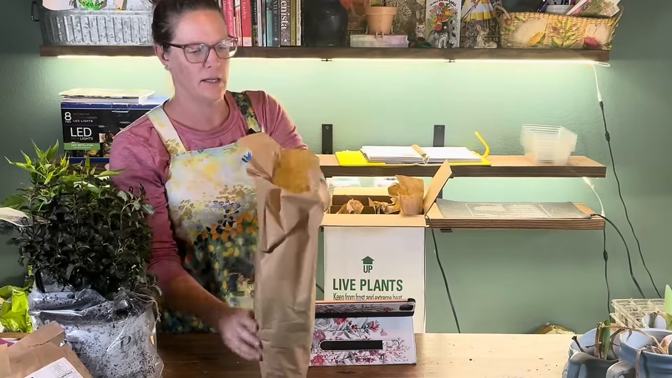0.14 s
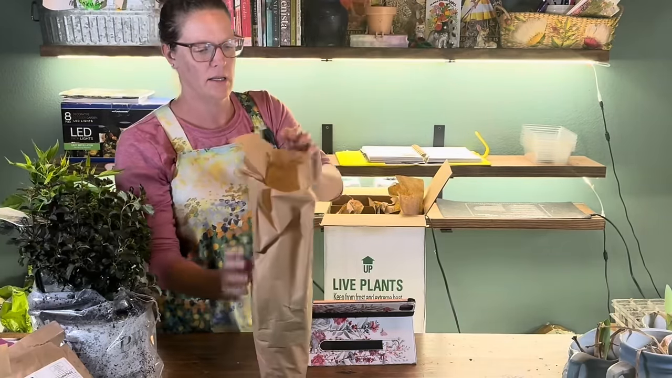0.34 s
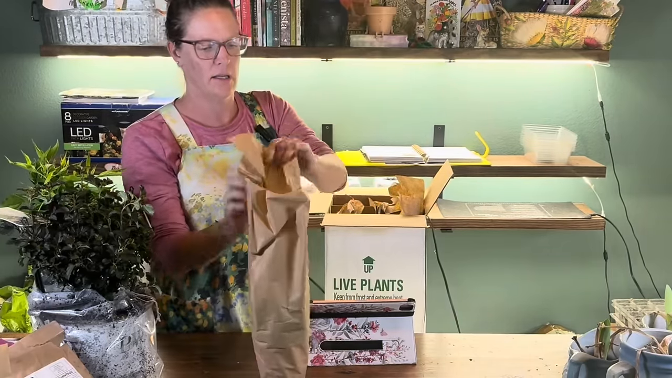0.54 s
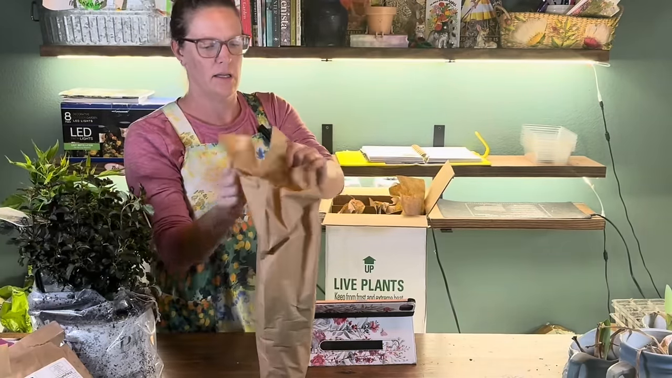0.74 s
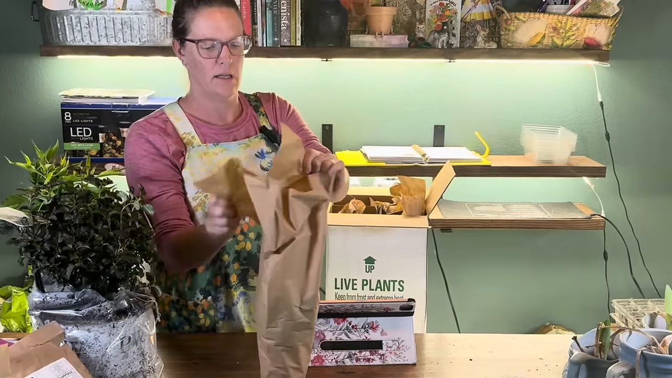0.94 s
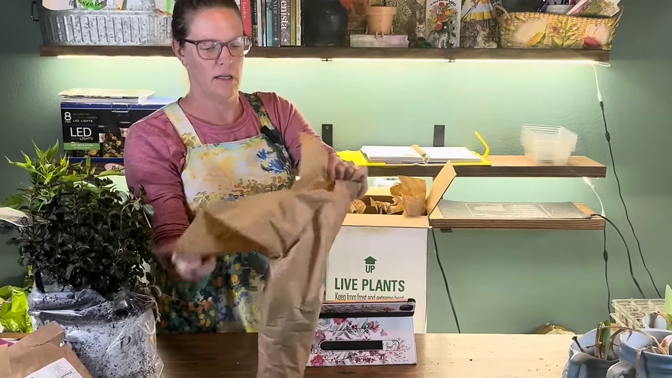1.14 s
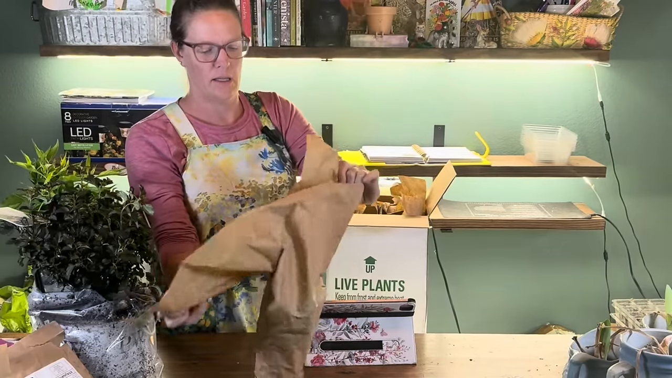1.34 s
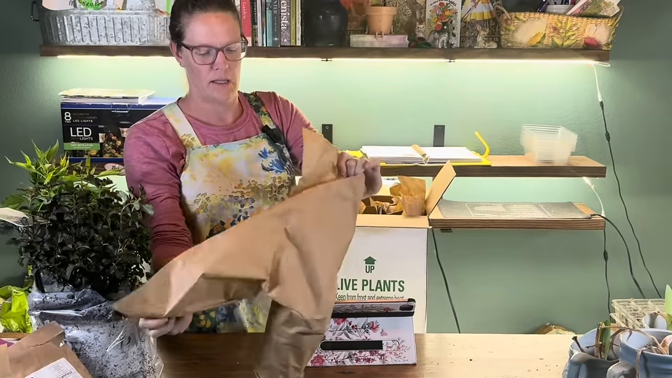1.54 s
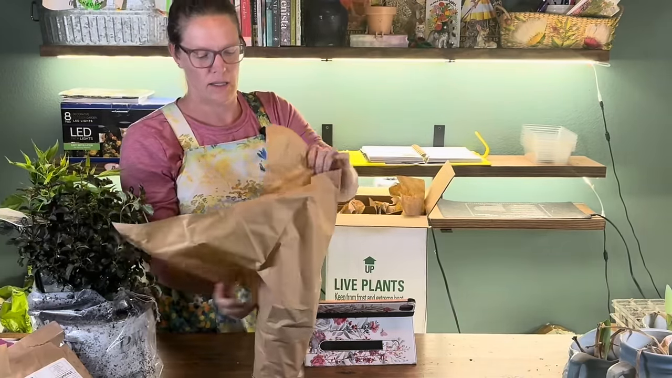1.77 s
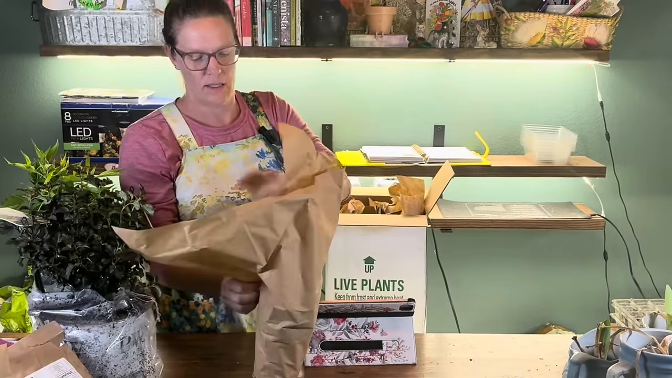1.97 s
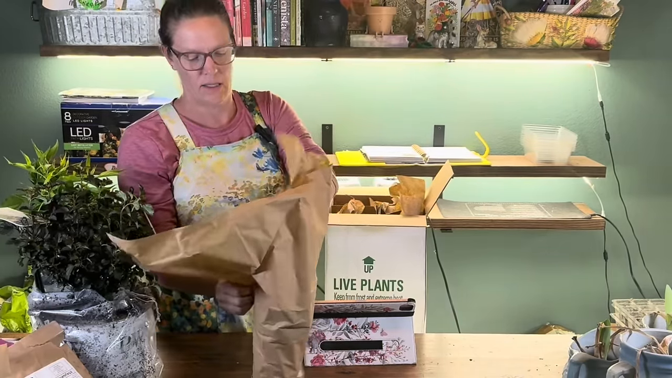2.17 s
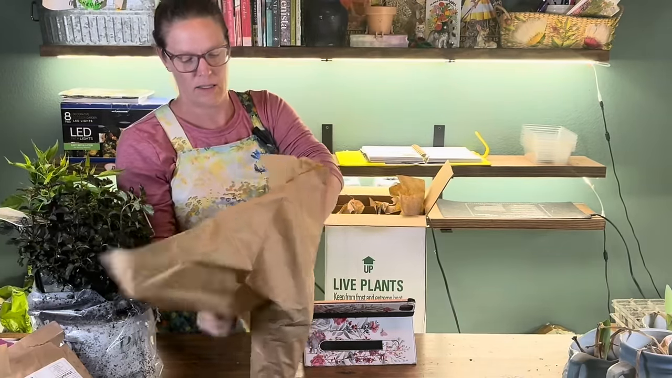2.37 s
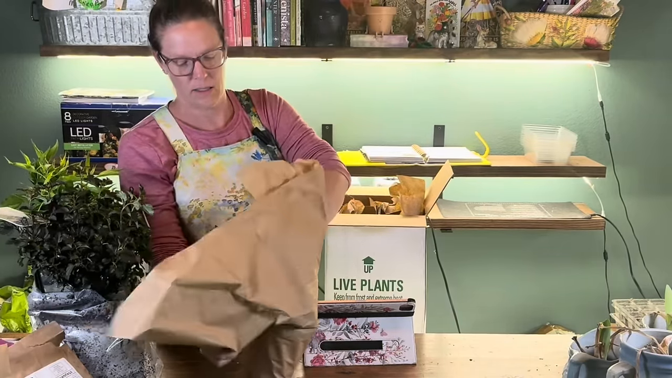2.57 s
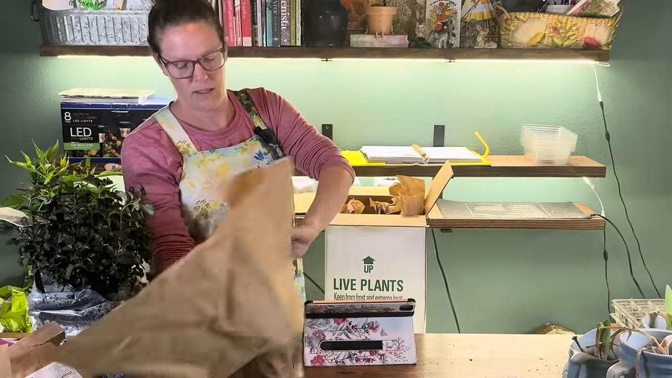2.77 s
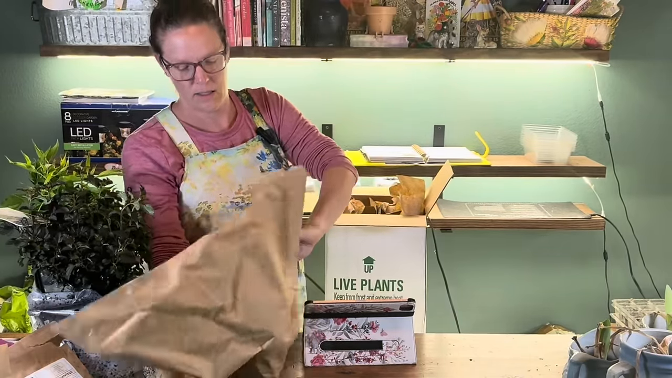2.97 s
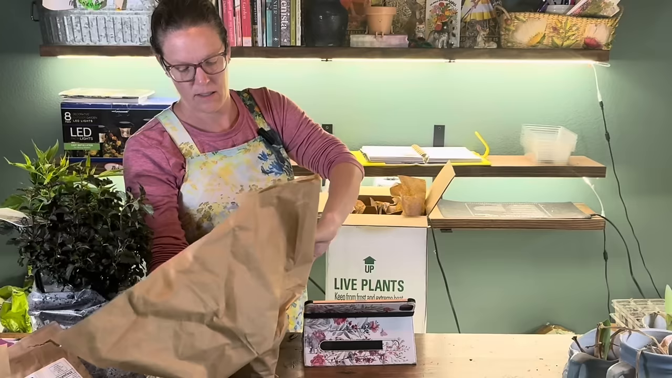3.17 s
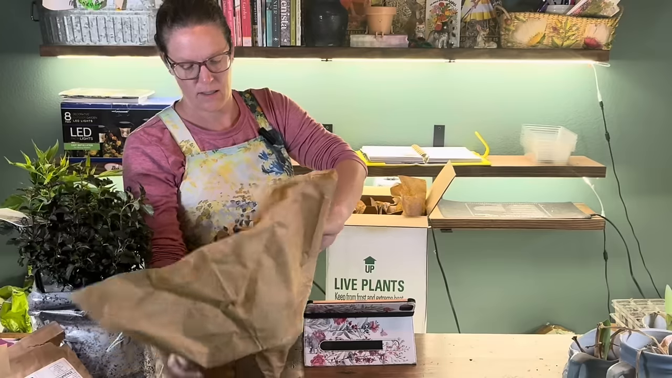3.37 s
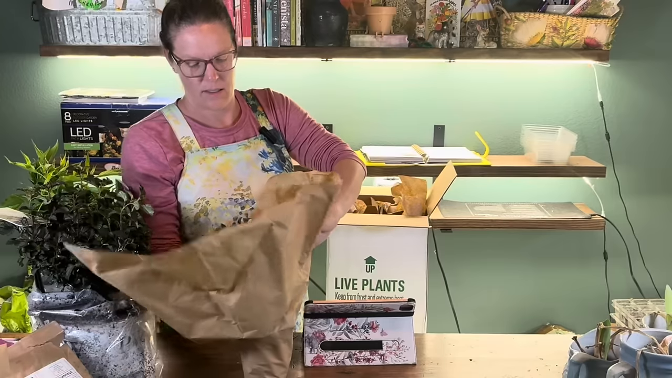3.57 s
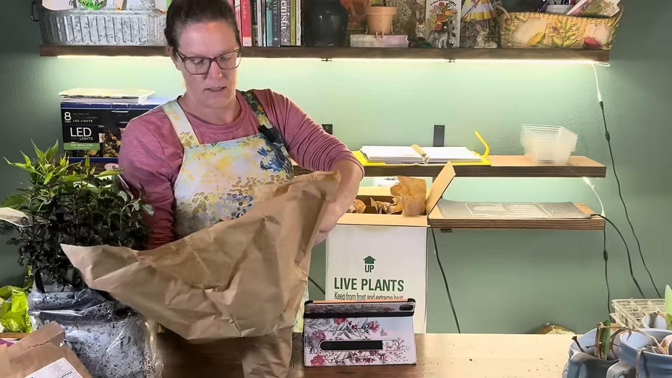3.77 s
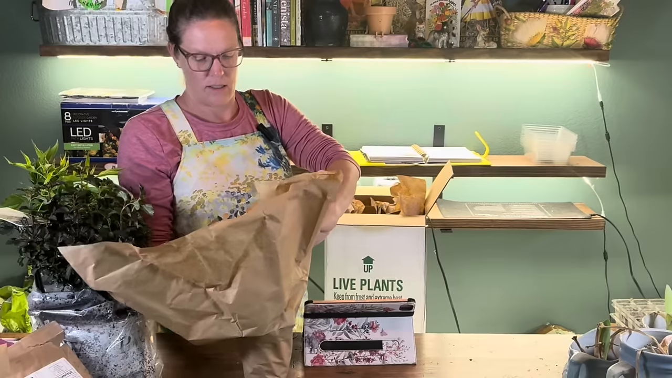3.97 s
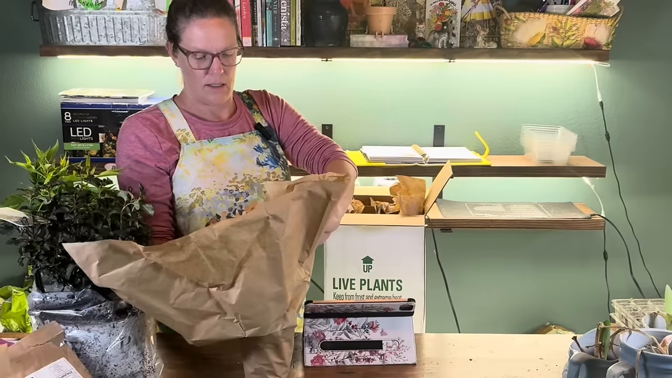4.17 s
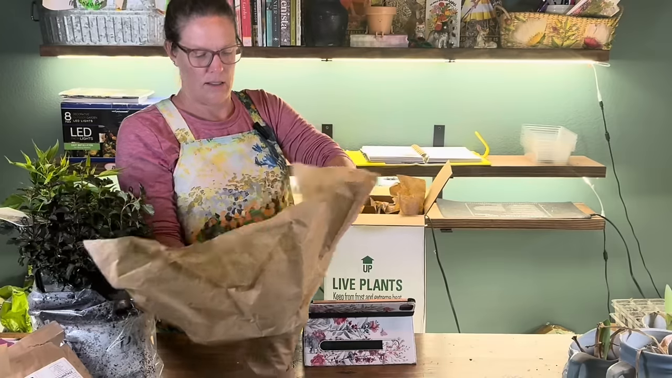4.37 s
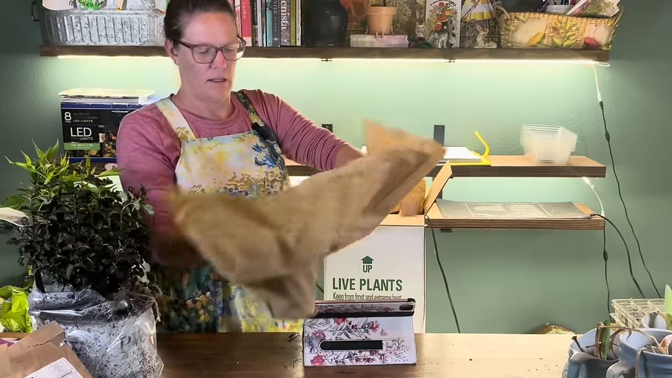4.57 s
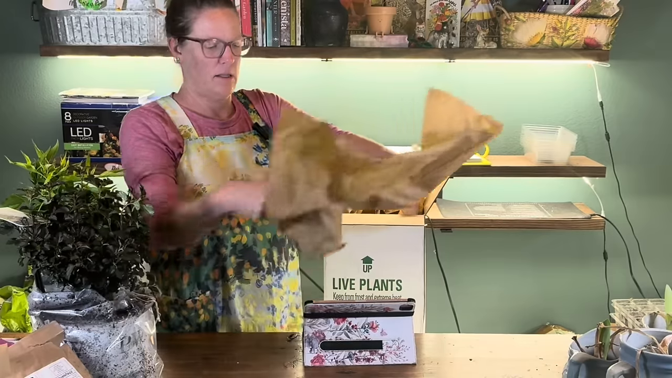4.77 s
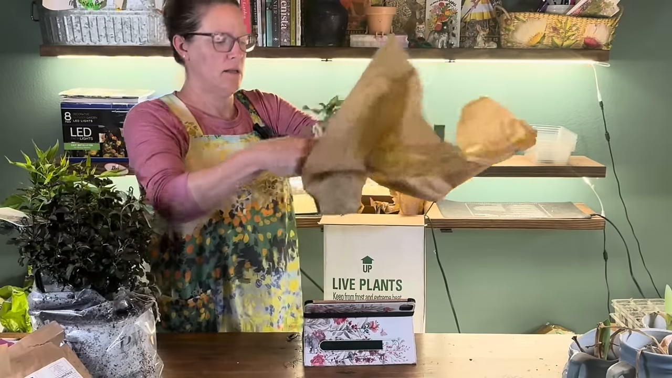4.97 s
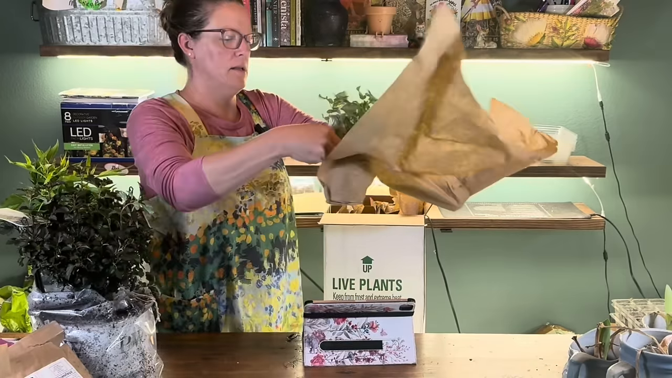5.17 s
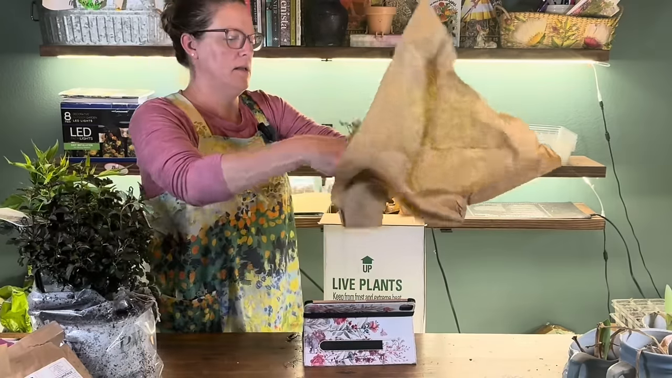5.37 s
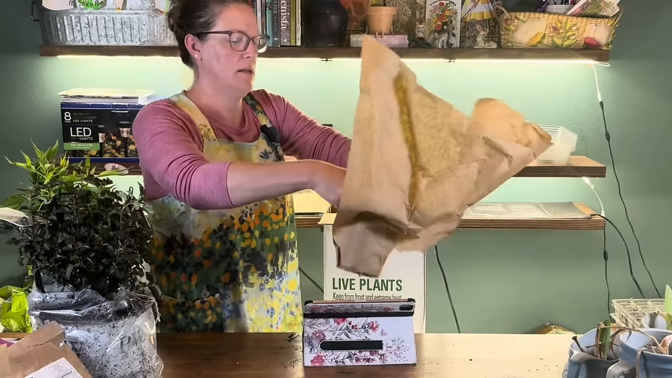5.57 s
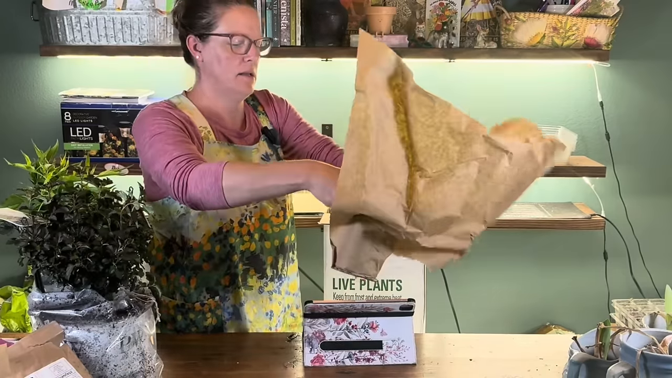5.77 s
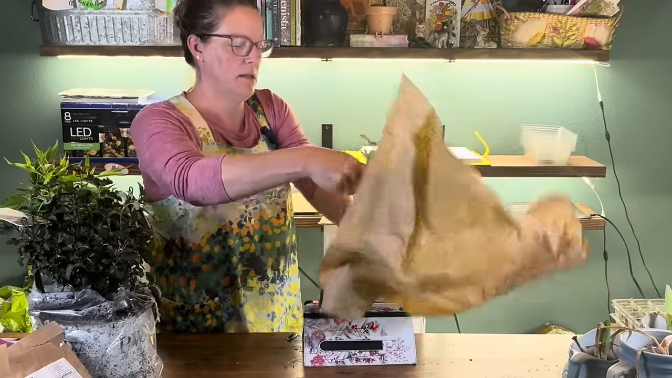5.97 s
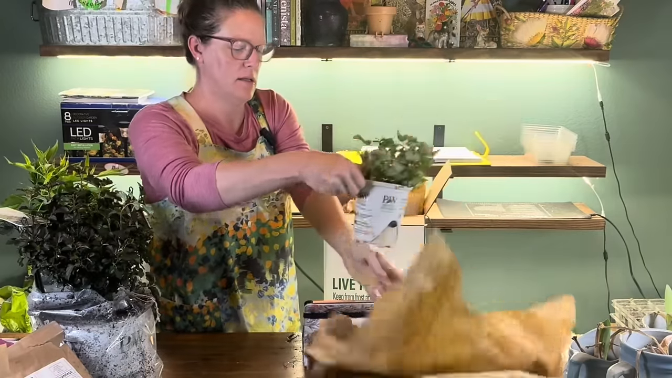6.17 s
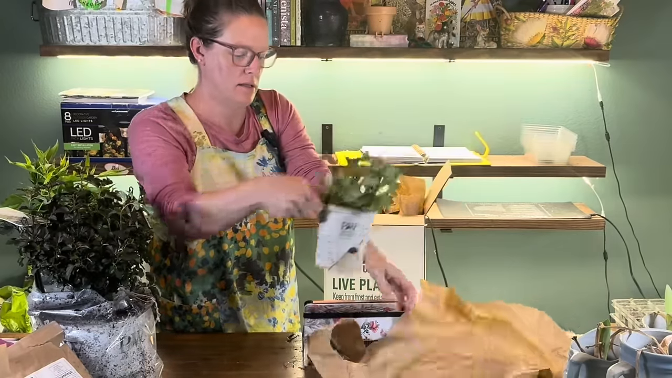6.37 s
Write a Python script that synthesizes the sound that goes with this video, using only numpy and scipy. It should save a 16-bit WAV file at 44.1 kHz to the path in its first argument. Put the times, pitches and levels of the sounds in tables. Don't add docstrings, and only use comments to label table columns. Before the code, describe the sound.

Thick paper wrapping crackles close to a phone microphone in a small room. It begins with crisp creases popping, swells into a long harsh crumple, and falls back to low wind-like thumps and faint rustle. Shorter hard bursts with sharp cracks come and go, separated by near-quiet handling. A later bright burst fades into sparse ticks, hollow taps and soft rubbing over faint room hiss.

```python
import sys
import numpy as np
from scipy import signal
from scipy.fft import rfft, irfft
from scipy.io import wavfile
from scipy.ndimage import uniform_filter1d

SR = 44100
rng = np.random.default_rng(int(sys.argv[2]) if len(sys.argv) > 2 else 0)


def boost(x):
    u = np.asarray(x, float) / 20
    return 10 ** u


def to_wav(sig):
    pcm = np.clip(np.atleast_2d(sig), -1, 1) * 32767
    pcm = np.round(pcm).astype(np.int16)
    wavfile.write(sys.argv[1], SR, pcm.T)


N = 282681


def evened(x):
    return x / np.sqrt(np.mean(x ** 2) + 1e-20)


def read(points, hz):
    f, value = np.transpose(points)
    return np.interp(np.log(hz + 1), np.log(f + 1), value)


def wander(samples):
    size = int(samples)
    smooth = uniform_filter1d(rng.standard_normal(N), size)
    return evened(uniform_filter1d(smooth, size))


def in_time(per_ms):
    return np.interp(np.arange(N) / SR * 1000, np.arange(len(per_ms)), per_ms)


def stroke(crest_s, rise_s, fall_s, db, bend=1.83):
    drop_db = 25
    late = np.arange(0, N / SR + .01, .001) - crest_s
    away = abs(late) / np.maximum(np.where(late < 0, rise_s, fall_s), .01)
    return boost(2 * (db - drop_db * np.minimum(away, 4) ** bend))


def background():
    # pitch_hz, level_db
    hiss_colour = [(15, -38), (25, 10), (119, -1), (193, -6.5), (297, 2), (800, -1), (1400, -5),
                   (2200, -8.5), (5160, -10), (7520, -2.5), (15600, -22.5)]
    # pitch_hz, rms_db
    hum_tones = [(120, -72), (300, -77)]
    hz = np.fft.rfftfreq(N, 1 / SR)
    hiss = irfft(rfft(rng.standard_normal(N)) * boost(read(hiss_colour, hz)), N)
    t = np.arange(N) / SR
    hum = sum(boost(db) * np.sqrt(2) * np.sin(2 * np.pi * f * t) for f, db in hum_tones)
    return boost(-61) * evened(hiss) + hum


def air():
    # crest_s, peak_db, pitch_hz, length_cycles
    puff_events = [(1.78, -32, 70, 0.52), (1.805, -36, 81.2, 0.42), (3.39, -45, 55, 0.4),
                   (3.647, -40, 149.5, 0.42), (4.079, -40.5, 130, 0.39), (5.274, -41, 90, 0.55),
                   (5.346, -41, 123, 0.39), (5.729, -39.5, 105, 0.66), (5.905, -40, 70.4, 0.51),
                   (6.229, -30, 131, 0.26), (3.602, -48.5, 590, 16), (3.655, -48.5, 603, 14),
                   (3.588, -42, 150, .5), (5.243, -40, 80, 0.5), (5.62, -47, 90, .6),
                   (5.642, -42.5, 130, 0.73), (5.657, -44, 80, .6), (1.635, -42, 120, 0.64),
                   (1.712, -46, 85, .8), (1.938, -43, 90, 1), (2.18, -44, 110, 0.76)]
    # crest_s, rise_s, level_db
    gust_events = [(.32, 0.053, -39), (1.12, 0.93, -46.5), (1.25, 0.091, -52), (1.39, 0.11, -34),
                   (1.689, 0.73, -49), (1.78, 0.065, -27.5), (1.95, 0.12, -32), (2.18, 0.15, -45.5),
                   (2.41, .22, -53), (2.73, 0.08, -37.5), (3.21, 1, -44.5), (3.639, 0.2, -41.5),
                   (4.08, 0.14, -41.5), (4.82, 0.3, -37), (5.14, .08, -71), (5.341, 0.63, -41),
                   (5.65, 0.12, -42), (5.91, 0.13, -51), (6.23, 0.056, -40.5), (6.41, 0.29, -46.5)]
    fall_s, calm_db = 0.094, -64.5
    t = np.arange(N) / SR
    pushes = np.zeros(N)
    for s, db, hz, cycles in puff_events:
        swell = np.exp(-((t - s) * hz / cycles) ** 2)
        pushes += boost(db) * swell * np.sin(2 * np.pi * hz * (t - s) + 1.0)
    band = signal.butter(2, [40, 170], "band", fs=SR, output="sos")
    rumble = signal.sosfilt(band, rng.standard_normal(N))
    lumpy = evened(rumble * boost(5.4 * wander(700)))
    power = boost(2 * calm_db) + sum(stroke(s, rise_s, fall_s, db, bend=1.0)
                                   for s, rise_s, db in gust_events)
    return pushes + in_time(np.sqrt(power)) * boost(-8.5) * lumpy


def taps():
    # start_s, peak_db, pitch_hz, t60_s
    tap_events = [
        (3.564, -43.5, 1040, 0.09),
        (3.568, -40, 806, 0.051),
        (3.673, -45, 970, .05),
        (5.592, -46, 740, 0.056),
        (6.0712, -41, 720, 0.066),
        (6.1535, -45.5, 904, 0.16),
        (6.2605, -41, 850, .1),
    ]
    t, out = np.arange(SR // 4) / SR, np.zeros(N + SR)
    for s, db, hz, t60 in tap_events:
        pair = np.sin(2 * np.pi * hz * t) + 0.92 * np.sin(2 * np.pi * 1.5 * hz * t)
        attack = np.minimum(t / 0.0009, 1)
        out[round(s * SR):][:len(t)] += boost(db - 60 * t / t60) * attack * pair
    return out[:N]


def causal(gain_db):
    log_gain = np.log(boost(np.maximum(gain_db, -100)))
    circle = np.concatenate([log_gain, log_gain[-2:0:-1]])
    response = np.fft.ifft(np.exp(np.conj(signal.hilbert(circle)))).real[:768]
    return response / np.linalg.norm(response)


def zones(draw, bump_db):
    # pitch_hz, level_db
    paper_colour = [(35, -60.5), (60, -46.5), (135, -21.5), (285, -8), (534, -8.5), (614, -5), (1350, -7),
                    (2260, -7), (3680, -6), (5590, -5), (7740, -1.5), (10000, -10), (11800, -12),
                    (14500, -15), (15800, -17)]
    # pitch_hz, width_hz, level_db
    port_humps = [
        (7820, 2000, 10),
        (2200, 240, -1.5),
    ]
    zone_edges_hz = [920, 2200, 5500]
    hz = np.fft.rfftfreq(1024, 1 / SR)
    humps = np.interp(hz, SR / 2 * np.linspace(0, 1, len(draw)) ** 1.5, draw)
    low, mid, high = (1 / (1 + ((hz + 1) / edge) ** 8) for edge in zone_edges_hz)
    port_db = sum(db / (1 + (2 * (hz - f) / width) ** 2) for f, width, db in port_humps)
    slid_hz = hz * np.exp(0.34 * draw[0] * (high - low))
    own_db = read(paper_colour, slid_hz) + bump_db * humps + port_db
    shares = 1 - high, low, mid - low, high - mid
    return np.array([causal(own_db + 10 * np.log10(share + 1e-9)) for share in shares])


def flutter(ms, draw, rise_ms=0.27):
    t_ms = np.arange(len(draw)) / SR * 1000
    burst = draw * (1 - np.exp(-t_ms / rise_ms)) * np.exp(-t_ms / np.maximum(ms, .1))
    return burst / np.linalg.norm(burst)


def snaps():
    # start_s, peak_db, panels_rel_db, middle_rel_db, ring_hz
    finger_folds = [(0.0673, -16.5, -23.5, -9.5, 5360), (.179, -19, -35, -10.5, 4190),
                    (0.2404, -32, -19, -8, 4930), (0.257, -14.5, -20, -15.5, 3470),
                    (.3571, -34.5, -2, 0, 4530), (0.4933, -8, -30, -9, 4030),
                    (0.5459, -32.5, -1, 6.5, 4760), (0.58, -13, -1.5, -1.5, 3900),
                    (0.6193, -23.5, -0.5, 5, 4000), (0.653, -12, -18, -5.5, 4640),
                    (0.69, -29.5, -5, 6, 3380), (0.71, -23, 2.5, 6, 3580), (0.728, -17.5, -2, 2.5, 4580),
                    (0.7483, -15.5, -8, -0.5, 4160), (1.573, -29.5, -12, -14, 4420),
                    (1.6221, -30.5, -7, 1.5, 4400), (1.6458, -26, -6, -8, 3430),
                    (1.6935, -34.5, -7, -4, 3200), (1.7243, -26, -2.5, -2.5, 4900),
                    (2.1777, -16.5, -14, -3, 4450), (2.203, -42.5, 10.5, -17, 3760),
                    (2.224, -26.5, -11, -12, 3740), (2.2705, -20.5, -24, -2.5, 3570),
                    (5.7742, -28, -3, -0.5, 2560), (0.247, -29.5, -10, -4, 3480),
                    (0.576, -27.5, -15, -1, 4000)]
    # start_s, peak_db, panels_rel_db, middle_rel_db
    pull_snaps = [(0.767, -13, -4, 2.5), (4.85, -9.5, -4, -9), (1.04, -11, -21, -4.5),
                  (1.336, -3, -31.5, -27.5), (1.3814, -5, -18, 1), (2.3023, -24, -24, -22.5),
                  (2.3925, -1, -29, -6.5), (2.6743, -18.5, -27, -32), (2.6912, -6, -21, -21),
                  (2.7254, -2, -12, -10.5), (3.1225, -21, -13, -21), (3.136, -6, -26, -32.5),
                  (3.149, -7, -30, -25), (3.169, 4.5, -39, -25.5), (3.1885, -2, -27.5, -27),
                  (3.202, 4.5, -35, -28), (3.281, -14.5, -24, -13), (4.4829, -10.5, -22, -21),
                  (4.5183, -5, -25, -44), (4.5509, -13.5, -31, -4.5), (4.7378, -19, -10.5, -16),
                  (4.7452, -15.5, -14, -14.5), (4.7572, -11.5, -16, -29), (4.7822, -2.5, -52.5, -10),
                  (4.9617, -22.5, -21, -23.5), (4.9713, -15.5, -17, -21), (4.9874, -17.5, -14, 0),
                  (5.0635, -17.5, -9.5, 1), (5.0783, -14.5, -8, 2.5), (5.1384, -6, -13.5, 4)]
    # start_s, peak_db, panels_rel_db, middle_rel_db
    more_folds = [(1.783, -30.5, -27, -24), (1.981, -44, -2, -2.5), (2.149, -39.5, -2, -12),
                  (3.022, -37.5, -5, -22), (3.323, -35, -2.5, -11), (3.359, -40, -25, -3),
                  (3.546, -58, 6, 1), (3.6252, -29.5, -26, -9), (3.7594, -32.5, -20.5, -19),
                  (3.832, -42.5, -11.5, -14), (3.936, -36, -21.5, -20), (4.018, -40.5, -8, -8.5),
                  (4.187, -46.5, 3, 0.5), (4.354, -36.5, -11, -9), (4.4294, -30, -9, -5),
                  (5.593, -41.5, 11.5, -20), (5.736, -31, -8.5, -16), (6.0703, -39, 5.5, -6.5),
                  (6.178, -23, -17, -10), (6.1842, -28, 1, -6), (6.26, -30, 2, -13), (0.0273, -39, 1, -13),
                  (5.8985, -42.5, -17, -19), (3.497, -38.5, -4, -3), (.097, -28.5, -4.5, -20),
                  (5.334, -19.5, -17, -22), (5.416, -32, -25, 0.5), (5.449, -27, -2.5, -5),
                  (5.5149, -25.5, -8.5, -7), (6.219, -22.5, -9, -0.5), (5.4297, -22, -14, -10),
                  (6.1527, -57, 4.5, -4.5), (5.787, -35.5, -8, -15), (5.339, -24.5, -15, -10.5),
                  (6.284, -34, -9, -6), (6.378, -48, 2, -5), (6.225, -27, -16, -7), (6.235, -35.5, -11, -8)]
    flurry_ms, flurry_spread, pulled_length_ratio = 2.2, 0.22, 0.88
    usual_ring_hz, ring_spread, ring_q, small_top_hz = 3900, 0.14, 4.8, 1900
    creases = finger_folds + pull_snaps + more_folds
    out = np.zeros(N + SR)
    small_filter = signal.butter(2, small_top_hz, fs=SR)
    draws = rng.standard_normal((len(creases), 624))
    for (s, db, panel_db, middle_db, *ring), draw in zip(creases, draws):
        ms = flurry_ms * np.exp(flurry_spread * draw[-1])
        if (s, db, panel_db, middle_db) in pull_snaps:
            ms *= pulled_length_ratio
        ring_hz = ring[0] if ring else usual_ring_hz * np.exp(ring_spread * draw[-2])
        tick = signal.unit_impulse(len(draw[24:]), 30) / ms
        slip = flutter(ms, draw[24:]) + 0.61 * tick
        responses = zones(draw[:24], bump_db=2.5)
        fine, large, small, middle = signal.fftconvolve(responses, slip[None], axes=1)
        small = signal.lfilter(*small_filter, small)
        middle = signal.lfilter(*signal.iirpeak(ring_hz, ring_q, SR), middle)
        parts = np.array([fine, large, small, middle])
        levels_db = np.array([-1.5, panel_db - 2.5, panel_db + 2.0, middle_db + 2])
        gains = boost(levels_db) / abs(parts).max(axis=1)
        out[round(s * SR):][:parts.shape[1]] += boost(db) * gains @ parts
    blunt = signal.butter(2, [400, 11500], "band", fs=SR, output="sos")
    return signal.sosfilt(blunt, out[:N])


def jerks():
    # centre_s, half_length_s, lift_db
    grip_slips = [(0.773, 0.0053, 1), (0.803, 0.0043, 2.5), (0.806, .005, 3.5), (0.854, 0.013, 5.5),
                  (0.868, 0.011, -6), (0.899, .008, 1.5), (0.979, 0.0026, 2), (1.039, 0.0034, 4),
                  (1.062, 0.0054, -3), (1.093, 0.0056, -1.5), (1.126, 0.0022, 1.5), (1.133, 0.0021, -1.5),
                  (1.165, 0.019, -2), (1.222, 0.0069, 1.5), (1.239, 0.0053, 0), (1.269, .005, 1.5),
                  (1.344, .005, 3), (1.352, 0.0022, 1.5), (1.366, 0.0038, 3.5), (1.392, 0.0068, 3.5),
                  (1.443, .008, 3), (2.406, .005, 5), (2.428, 0.0021, 6.5), (2.499, .007, 0.5),
                  (2.509, .003, 1.5), (2.531, 0.0012, 1), (2.546, .003, 8.5), (2.7, 0.0028, 2.5),
                  (2.709, 0.0046, 2), (2.722, .005, 1), (2.739, 0.0099, 3.5), (2.798, .008, 5),
                  (2.828, .004, 4.5), (2.843, 0.0089, 2), (2.871, 0.0072, -6), (2.883, 0.012, 4),
                  (3.12, 0.0061, 0.5), (3.137, .005, 1.5), (3.167, 0.0088, 8.5), (3.192, .003, -2),
                  (3.195, 0.0043, 9.5), (3.204, 0.0029, 0), (3.223, 0.0047, 2.5), (3.248, 0.0044, 2),
                  (3.855, 0.0287, -17), (4.491, 0.0048, 9), (4.507, .005, -6), (4.531, .005, 4.5),
                  (4.569, 0.0068, 5), (4.631, 0.0089, 1), (4.755, 0.0046, 7.5), (4.775, 0.0092, 1.5),
                  (4.797, 0.0049, -7), (4.826, 0.011, 4.5), (4.871, 0.0042, 5.5), (4.994, 0.0083, -0.5),
                  (5.021, .006, 1), (5.104, .005, 5.5), (5.154, 0.008, 3), (5.188, .004, 4)]
    t = np.arange(0, N / SR + .01, .001)
    return sum(db * np.exp(-((t - s) / max(length, .002)) ** 2) for s, length, db in grip_slips)


def hands():
    # crest_s, rise_s, fall_s, crest_db, panel_size_db
    strong_pulls = [(.8, 0.062, 0.056, -16.5, 4), (.93, 0.18, 0.38, -16.5, 2),
                    (1.08, 0.23, 0.23, -7.5, -2.5), (1.21, 0.037, 0.16, -12.5, -4),
                    (1.275, 0.23, 0.024, -7, -4.5), (1.345, 0.013, 0.035, -29.5, -3),
                    (1.385, 0.069, 0.059, -10.5, -0.5), (1.45, 0.13, 0.064, -11, 1),
                    (2.39, 0.13, 0.17, -16.5, 1.5), (2.49, 0.17, 0.066, -16, -3.5),
                    (2.78, 0.15, 0.16, -12, -3.5), (3.15, 0.039, 0.049, -18, -4.5),
                    (3.212, 0.049, 0.082, -16.5, -5), (4.535, 0.058, 0.098, -24, -6),
                    (4.6, 0.14, 0.16, -21, 1.5), (4.785, 0.067, 0.15, -22, 4.5),
                    (4.86, 0.21, 0.057, -30, 5.5), (4.91, 0.051, 0.043, -36, 7.5),
                    (4.99, 0.055, 0.14, -26.5, 7), (5.15, 0.16, 0.091, -18, 3.5)]
    # crest_s, rise_s, fall_s, crest_db, panel_size_db
    light_rustles = [(0.069, 0.13, 0.27, -38, -2.5), (0.203, 0.04, 0.16, -38, 0),
                     (.37, 0.089, 0.11, -37.5, 0), (0.502, 0.1, 0.21, -37.5, -2.5),
                     (0.588, 0.065, 0.1, -30, 3), (0.662, 0.014, 0.093, -33, 3),
                     (1.62, 0.72, 0.32, -41.5, 3.5), (1.832, 0.22, 0.18, -36, 3),
                     (2.178, 0.04, 0.18, -46, 8), (2.632, 0.39, 0.051, -33, -4.5),
                     (3.07, 1, 0.056, -53.5, 16), (3.38, 0.84, 0.47, -44.5, -0.5),
                     (3.642, 0.2, 0.11, -41, 1), (3.8, .1, 0.069, -67, -1.5),
                     (3.9, .02, 0.045, -52.5, -2.5), (3.94, 0.037, 0.052, -56, 0),
                     (4.035, 0.044, 0.1, -50.5, -5.5), (4.3, 0.3, 0.95, -49.5, 1.5),
                     (6.279, 0.052, 0.062, -38, 6.5), (5.781, 0.04, 0.019, -38, 4),
                     (5.63, 0.056, 0.037, -50.5, 4.5), (6.165, 0.031, 0.059, -62, 27),
                     (5.397, 0.26, 0.22, -34, 2.5), (5.79, 0.14, 0.23, -45, 1.5),
                     (5.86, 0.092, 0.11, -45.5, 7.5), (5.923, 0.037, 0.053, -38, 0.5),
                     (6.225, 0.065, 0.062, -33.5, 4), (6.351, 0.15, 0.32, -52, 4),
                     (6.085, 0.0212, 0.095, -58, 9)]
    # level_db, size_follow (ratio), drift_db
    panel_levels = [
        (-14.5, 1.12, 1.5),
        (-11, 1.22, 0),
        (-5, 0.44, 1.0),
    ]
    # start_s, opened_db, crushed_db
    sheet_state = [(0, 7, -2), (.5, -4.5, 1), (0.899, -0.5, -0.5), (1.1, -3, 1), (1.231, -1.5, 0),
                   (1.45, -2.5, 0), (2.0, 1.5, -0.5), (2.4, -2, 0), (2.5, -0.5, 1.5), (2.75, -3.5, 0.5),
                   (3.2, 0.5, -0.5), (3.7, 1, 0), (4.3, -0.5, 0.5), (4.6, 1.5, 0.5), (4.85, 1.5, 3),
                   (5.15, 2.5, 2), (5.4, -6, 2), (6.4, 1, 1)]
    state_shares = [
        (0.85, 0.049),
        (-0.54, 0.24),
        (-0.17, 1.3),
    ]
    rest_db, rest_size_db = -70, 9.5
    moves = strong_pulls + light_rustles
    power, rest = np.array([stroke(*row[:4]) for row in moves]), boost(2 * rest_db)
    total = power.sum(0) + rest
    sizes_db = np.transpose(moves)[-1]
    size_db = in_time((sizes_db @ power + rest_size_db * rest) / total)
    s, *states = np.transpose(sheet_state)
    t = np.arange(N) / SR
    state_db = np.array(state_shares) @ [np.interp(t, s, state) for state in states]
    effort_db = in_time(10 * np.log10(total) + jerks())
    rel_db = [db + follow * size_db + moved_db + drift_db * wander(800)
              for (db, follow, drift_db), moved_db in zip(panel_levels, state_db)]
    return effort_db, rel_db


def crackle(per_s=1050, denser=.5, spread_db=3.0, clump_db=0.93, count=17):
    fine_db, rel_db = hands()
    chance = np.clip(per_s * boost(denser * (fine_db + 46.0)) / SR, .065, .18)
    sizes_db = spread_db * np.minimum(rng.exponential(1, N), 4)
    sizes = evened(boost(sizes_db) * rng.choice([-1., 1.], N))
    clumps = evened(boost(clump_db * wander(320)))
    slips = sizes * (rng.random(N) < chance) / np.sqrt(chance) * clumps
    drive = slips * boost(fine_db + np.array([0 * fine_db, *rel_db]))
    hand = np.arange(N) // 1000
    patch = (hand + rng.integers(0, count // 2, N)) % count
    out = np.zeros(N)
    for k, draw in enumerate(rng.standard_normal((count, 324))):
        slip = evened(flutter(.6, draw[24:]) + 1.1 * signal.unit_impulse(300, 20)) / np.sqrt(300)
        grains = signal.fftconvolve(zones(draw[:24], bump_db=2.0), slip[None], axes=1)
        out += signal.oaconvolve(drive * (patch == k), grains, axes=1)[:, :N].sum(0)
    return out


def hollow(x):
    # start_s, low_hz, high_hz, low_share (ratio), high_share (ratio)
    panel_shape = [(0, 880, 4240, 0.67, 0.31), (.75, 940, 3870, 0.97, 0.61), (.85, 780, 4040, 0.5, 1.2),
                   (1.15, 1250, 3900, 1.6, 0.65), (1.38, 1056, 3970, 0.3, 0.36),
                   (1.454, 875, 3015, .5, 1.5), (1.6, 940, 3620, 0.37, 0.36), (2.33, 1000, 4600, 0.7, .5),
                   (2.42, 1000, 4220, 0.31, 0.34), (2.5, 642, 3170, 1, 0.47), (2.69, 910, 4700, 1.1, 0.87),
                   (2.83, 705, 3350, 1.6, 0.27), (3.2, 730, 5030, 1.19, 0.22),
                   (4.499, 670, 5200, 0.76, 0.36), (4.62, 644, 3240, 0.92, 0.34),
                   (4.79, 640, 3680, 1, 0.22), (4.9, 845, 4350, 0.13, 0.39), (5.12, 615, 3900, 0.71, .1)]
    tone_widths_hz = [350, 1520]
    s, *columns = np.transpose(panel_shape)
    low_hz, high_hz, low, high = (np.interp(np.arange(N) / SR, s, column) for column in columns)
    out = x.copy()
    for tone_hz, share, width_hz in zip((low_hz, high_hz), (low, high), tone_widths_hz):
        turn = np.exp(2j * np.pi * np.cumsum(tone_hz) / SR)
        r = np.exp(-np.pi * width_hz / SR)
        out += share * 2 * (turn * signal.lfilter([1 - r], [1, -r], x / turn)).real
    return out


def turned(x):
    # start_s, above_10_khz_db, near_6_khz_db
    sheet_facing = [(0, -13, 0), (.35, -1.5, 0), (0.601, -1.5, -0.5), (1.399, -6, 1), (1.85, -1.5, 1),
                    (2.35, -6, 1.5), (2.55, -8.5, 0), (3.2, -7, 1), (4.2, -8, -3.5), (4.45, -8, 1),
                    (4.62, -4, 5), (4.78, 8.5, -1), (5.0, 5, 5.5), (5.3, 3, 0), (5.55, 3, -3),
                    (5.901, 1.5, 0), (6.17, 2, -0.5), (6.25, -5, 0)]
    # start_s, near_2400_hz_db, near_9500_hz_db
    sheet_lift = [(0, 3.5, -1), (.45, 1, -1), (.58, -3, -2), (.9, -3.5, -0.5), (1.12, -2.5, -0.5),
                  (1.3, 0, -2), (1.75, 2.5, 1), (2.15, 1.5, -1), (2.35, -2.5, 1.5), (2.75, 1, 2),
                  (3.2, 1, 0), (3.9, 2.5, -2), (4.28, -3, 2.5), (4.47, 2.5, -1.5), (4.75, 1.5, -0.5),
                  (5.15, 2.5, 1.5), (5.55, 2, 4), (6.1, -3, 0)]
    s, top_db, side_db = np.transpose(sheet_facing)
    at, dip_db, skirt_db = np.transpose(sheet_lift)
    top = signal.sosfiltfilt(signal.butter(2, 10000, "high", fs=SR, output="sos"), x)
    side, dip, skirt = (signal.sosfiltfilt(signal.butter(1, hz, "band", fs=SR, output="sos"), x)
                        for hz in ([5000, 7000], [1700, 3200], [8500, 11000]))
    moves = (top, s, top_db), (side, s, side_db), (dip, at, dip_db), (skirt, at, skirt_db)
    t = np.arange(N) / SR
    return x + sum(part * (boost(np.interp(t, when, db)) - 1) for part, when, db in moves)


def echoes(wet_db):
    # pitch_hz, t60_s
    room_decay = [(300, 0.27), (800, 0.031), (2100, 0.25), (5500, 0.11), (12000, 0.14)]
    # delay_s, level_db
    bench_echoes = [(.0021, -10), (.0037, -13), (.0062, -15), (.0105, -17)]
    impulses, slots = np.zeros(SR // 2), np.arange(300, SR // 2 - 20, 20)
    impulses[slots + rng.integers(0, 20, len(slots))] = rng.choice([-1., 1.], len(slots))
    hz, t, z = signal.stft(impulses, SR, nperseg=256)
    decay = boost(-60 * t / read(room_decay, hz)[:, None])
    tail = signal.istft(z * decay, SR, nperseg=256)[1]
    tail *= boost(wet_db) / np.linalg.norm(tail)
    for s, db in bench_echoes:
        tail[round(s * SR * rng.uniform(.75, 1.25))] += boost(db)
    return tail


def room(x, wet_db=-11, stay_s=.04, count=8):
    place = np.arange(N) / (SR * stay_s)
    out = x.copy()
    for k in range(count):
        away = (place - k + count / 2) % count - count / 2
        here = np.cos(np.pi / 2 * np.clip(away, -1, 1))
        out += signal.oaconvolve(x * here ** 2, echoes(wet_db))[:N]
    return out


def scene():
    paper = boost(-2.0) * hollow(crackle()) + snaps() + taps()
    return (room(turned(paper)) + air() + background())[None]


def band_limit(x):
    return signal.sosfilt(signal.butter(12, 15700, fs=SR, output="sos"), x)


def record(dry, ceiling=1.2):
    squeezed = dry / (1 + abs(dry / ceiling) ** 4) ** .25
    edge = signal.firwin(767, 15800, window=("kaiser", 8), fs=SR)
    mix = signal.oaconvolve(squeezed, edge[None], "same")
    return band_limit(mix)


dry = scene()
out = record(dry)
to_wav(out)
```